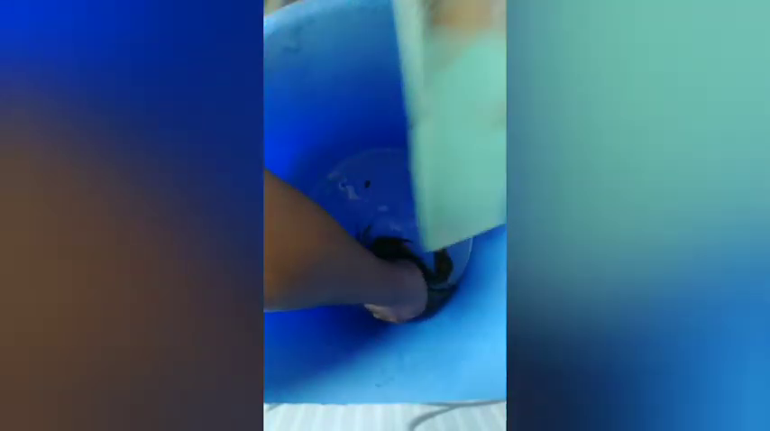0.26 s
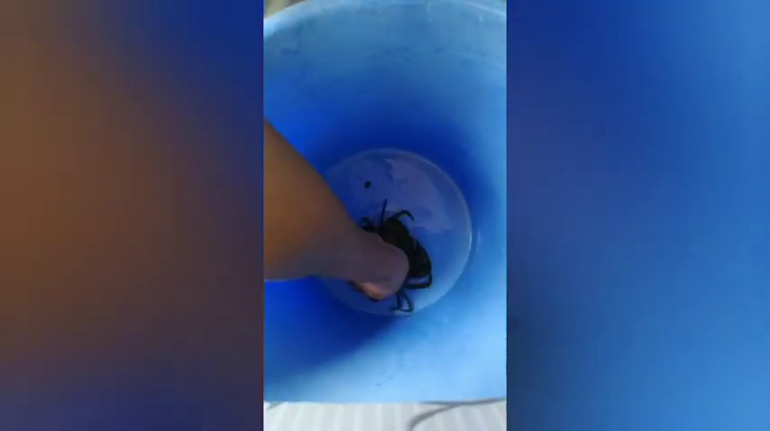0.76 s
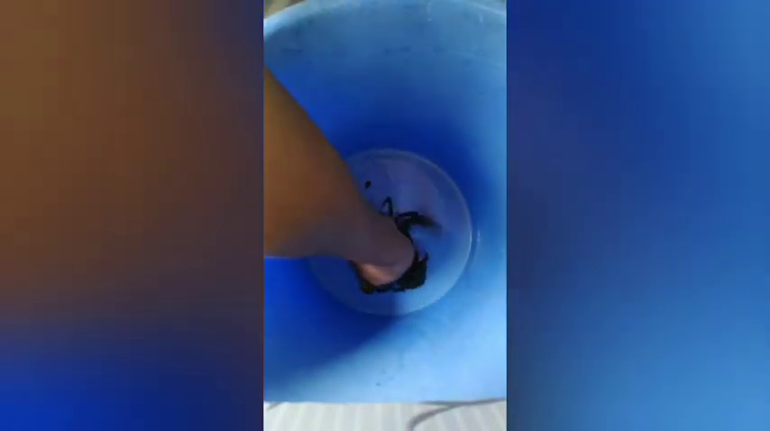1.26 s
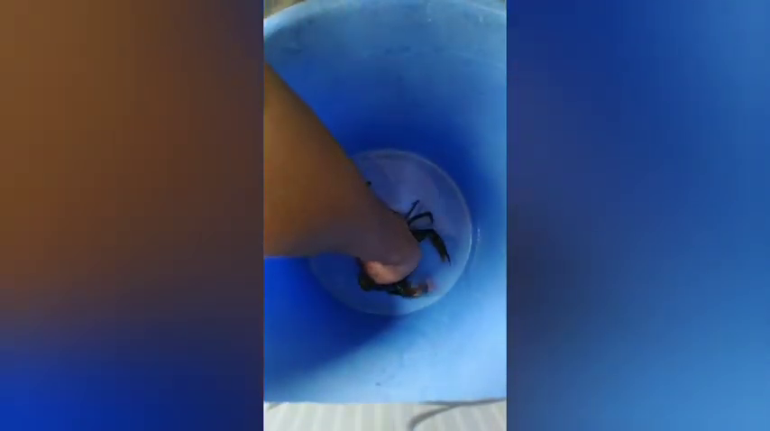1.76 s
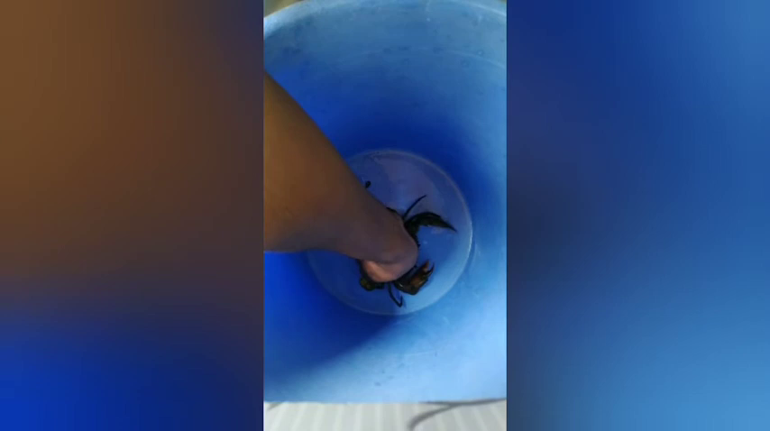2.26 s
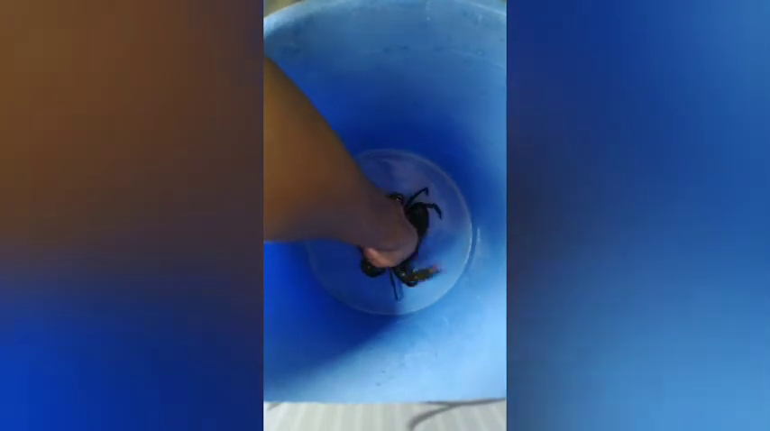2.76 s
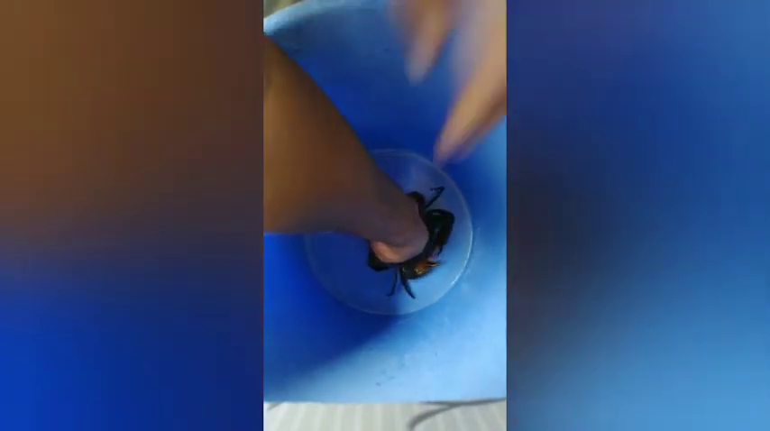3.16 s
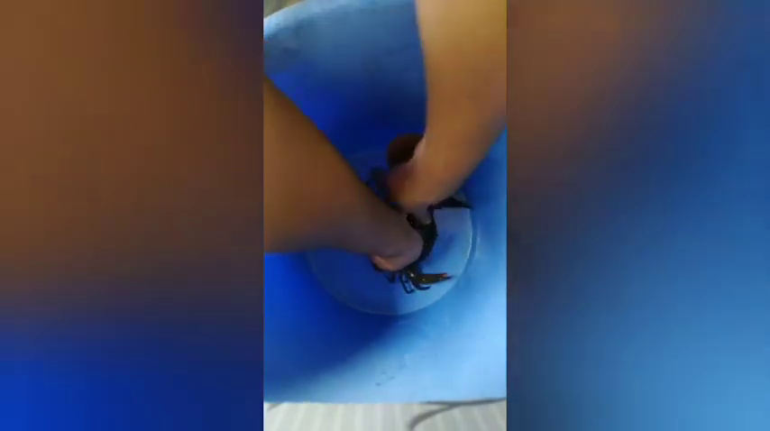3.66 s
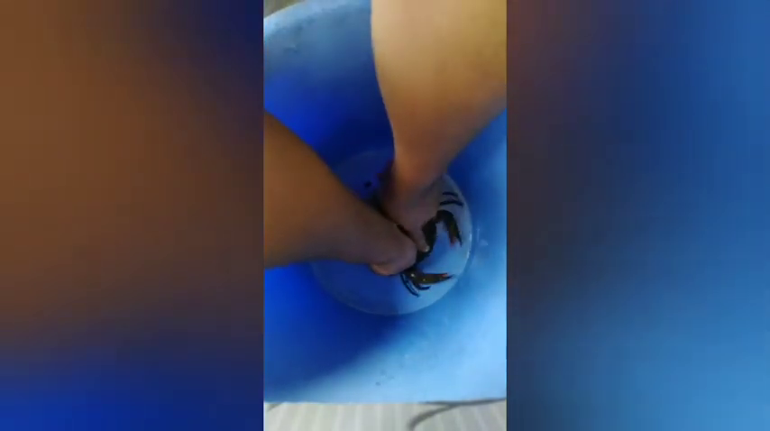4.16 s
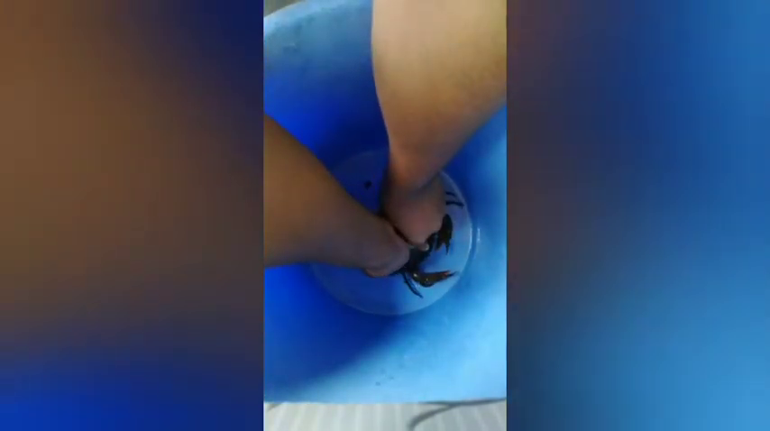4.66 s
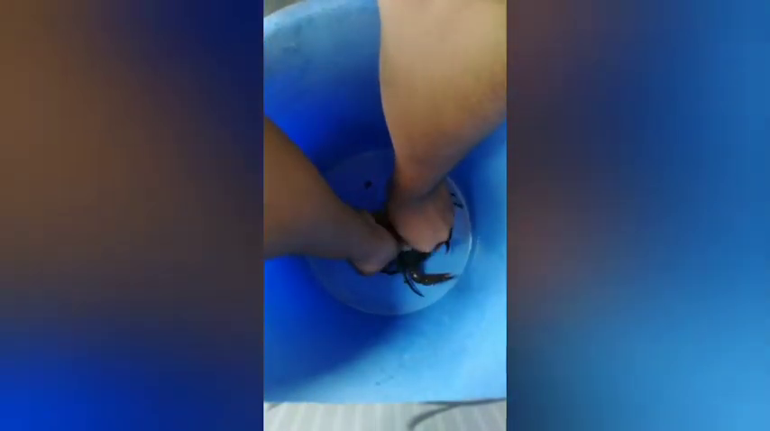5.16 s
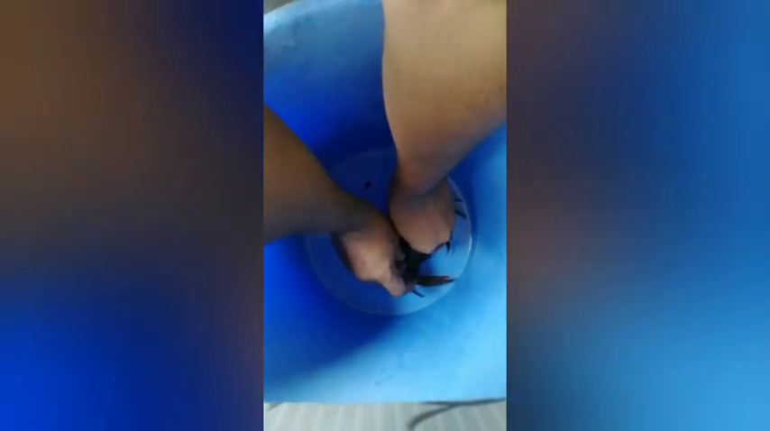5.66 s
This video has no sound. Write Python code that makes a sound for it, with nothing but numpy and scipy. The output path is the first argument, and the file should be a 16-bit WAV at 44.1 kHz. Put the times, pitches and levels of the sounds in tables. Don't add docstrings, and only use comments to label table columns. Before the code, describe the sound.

Close outdoor stereo of a live crab pinned in a plastic bucket. Hard shell knocks, claw scrapes and tiny leg ticks come in uneven bursts, with short squeaks and hollow hums from the plastic. A calmer gap falls around one and a half to two seconds, a dense scrabble follows, then only faint hand rubs and a few light taps remain over soft hiss and low rumble. Sound leans right.

```python
import sys
import numpy as np
from scipy import signal
from scipy.io import wavfile

SR = 44100
rng = np.random.default_rng(int(sys.argv[2]) if len(sys.argv) > 2 else 0)


def how_loud(loudness_db):
    steps = np.asarray(loudness_db, float) / 20
    return 10 ** steps


def put_to_file(sound):
    columns = np.atleast_2d(sound).T
    safe = np.clip(columns, -1, 1)
    whole_steps = np.round(safe * 32767)
    wavfile.write(sys.argv[1], SR, whole_steps.astype(np.int16))


N = 260190

# frequency in Hz, level in dB, decay t60 in seconds.
BOOM_MODES = [(128, -7.5, 0.019), (164, -9, 0.084), (230.1, 3, 0.13), (264, 0, 0.034), (319.3, -8.5, 0.081),
              (350, -8, 0.15), (389, -5.5, 0.023)]
# frequency in Hz, level in dB, decay t60 in seconds.
WALL_MODES = [(477, -6, 0.086), (560, -4, 0.093), (668, 3.5, 0.02), (837, -0.5, 0.027), (834, -7, 0.053),
              (1012, -4, 0.026), (1137, 0, 0.041), (1200, 4, 0.012), (1410, -1, 0.019), (1483, 0, 0.056),
              (1700, 2.5, 0.0038)]
# frequency in Hz, density in dB per Hz.
UPPER_SPECTRUM = [(1900, -5), (2500, -1.5), (3500, -4.5), (5000, -6), (7500, -10), (10000, -8.5),
                  (15500, -21.5)]

# time of full force in seconds, hold in seconds, wall level in dB,
# scratch level relative to the wall in dB, boom level relative to the wall in dB.
DRAGS = [(.036, 0.02, -24.5, -2.5, -4), (.085, 0.059, -33.5, -6.5, 3.5), (.218, 0.029, -27.5, -3.5, -5.5),
         (.2, .004, -34, -9.5, -3), (.275, 0.037, -30, -11, -11), (.584, 0.069, -35, -3, -5),
         (.69, 0.099, -41, -8, 4), (.893, 0.0039, -50.5, -1, 28.5), (1.1, 0.054, -45.5, -2, 1.5),
         (1.146, 0.0055, -30, -4, -25), (1.212, 0.0084, -32, -8, -8), (1.25, 0.043, -23.5, 2.5, -36),
         (1.272, 0.038, -31, -8, 13), (1.372, 0.014, -28, -8, 2.5), (1.42, 0.015, -29, 5.5, -5.5),
         (2.15, 0.038, -33, -4.5, -2), (2.342, 0.017, -23.5, 0.5, -5.5), (2.405, 0.045, -23.5, 6, -9.5),
         (2.53, .004, -28.5, -8.5, -4), (2.6, 0.004, -31, -7, 14), (2.638, .003, -31, 1.5, -7),
         (2.68, 0.0043, -29.5, -2, 5), (2.716, 0.0065, -22, -11, -8), (2.868, 0.055, -25.5, 0, -11.5),
         (2.94, 0.031, -25.5, -8.5, -1), (3.0, 0.065, -25.5, 0.5, 1.5), (3.25, 0.046, -30.5, -10, -15.5)]
# time of full force in seconds, hold in seconds,
# wall level in dB, relative scratch level in dB, relative boom level in dB.
JOLTS = [(.33, 0.0011, -19, -13, -21), (.624, 0.0018, -30, 3.5, -12), (.712, 0.0023, -25, -24, 1.5),
         (.733, 0.0033, -24.5, -11, -19), (1.008, 0.0013, -23.5, 1, -12.5), (1.408, 0.0028, -27.5, 10, -10),
         (2.448, 0.023, -19.5, -12, -3), (3.06, 0.0062, -28.5, -16, 12), (4.735, 0.0014, -40, -9.5, -21),
         (5.18, 0.0028, -52, -2.5, -3), (.427, 0.014, -12.5, -12.5, -4.5), (.47, 0.022, -28, -10, -12),
         (.838, 0.00088, -24, -4.5, -4), (.96, 0.0014, -16, -10, -22), (.978, 0.0081, -29.5, 7.5, -13),
         (1.737, 0.0012, -14.5, -8.5, -9), (2.538, 0.0018, -22, -13.5, -7), (2.575, 0.0077, -34, 5.5, -6),
         (2.642, 0.0037, -18, -2.5, 3), (3.168, 0.00076, -33, -0.5, 2.5), (3.4, 0.0025, -28.5, -4.5, -5),
         (3.425, 0.0047, -38.5, -3.5, -2), (3.935, 0.0015, -32.5, -4, -20), (5.462, 0.002, -48.5, 8, -1),
         (5.808, 0.0022, -38, 6, 4.5)]
# time of full force in seconds, hold in seconds,
# wall level in dB, relative scratch level in dB, relative boom level in dB.
GRIP_SHIFTS = [
    (1.48, 0.022, -60, -9, 10),
    (1.79, 0.0048, -45.5, -3, 1.5),
    (2.25, 0.061, -52.5, -8, 6.5),
    (2.82, 0.0032, -43, -8, -7),
    (3.46, 0.0032, -48.5, 1, -12),
    (3.55, 0.076, -60, -1, 5.5),
    (4.15, 0.072, -49.5, -7, -4.5),
    (4.384, 0.043, -58.5, -7, 12.5),
    (4.7, 0.014, -53, -28, 5.5),
    (4.8, 0.0099, -72, 11, -4),
]
# time of full force in seconds, hold in seconds,
# wall level in dB, relative scratch level in dB, relative boom level in dB.
CATCHES = [(.041, 0.002, -37, 4, -23), (.067, 0.0055, -35.5, 3, -13), (.135, 0.0074, -35, -13, -10),
           (.15, 0.0036, -53, -10, -15), (.297, 0.0046, -36, -21, -17), (.687, 0.005, -30, -16, -10),
           (.74, 0.0034, -22, -22, -19), (.852, 0.0082, -37, -4, -10), (.913, 0.0074, -44.5, -3.5, 19.5),
           (1.19, 0.0033, -37, -7, -7), (1.213, .004, -29.5, -11.5, -19), (1.258, 0.0029, -28, -16, -22),
           (1.383, 0.0048, -22, -9, -19), (1.419, 0.0025, -37.5, -9, -26), (1.433, 0.0027, -42, -6, -20),
           (1.72, .006, -37, 3.5, -4), (2.16, 0.0035, -51, -21, -18), (2.322, 0.0046, -28, -16, -21),
           (2.35, 0.0018, -32, 14, -9), (2.383, 0.0018, -27.5, 14.5, -20), (2.396, 0.0032, -37, 12, -28),
           (2.55, 0.0028, -51, -19, -1), (2.594, 0.0053, -26, 0, 1), (2.687, .004, -31, -17, -10),
           (2.706, 0.0027, -30, -14, -10), (2.887, .005, -26, 7, -20), (2.924, 0.005, -30.5, 5, -16),
           (2.963, .004, -22.5, -15, -10), (2.99, 0.0037, -19, -13, -21), (3.011, 0.0064, -29, 0, -19.5),
           (3.029, 0.0037, -28.5, 8.5, -20), (3.049, 0.0027, -28, 8, -20), (3.062, 0.0039, -17.5, -23, -20),
           (3.097, 0.0018, -27, -4, -0.5), (3.261, 0.003, -32, -16, -26), (3.28, 0.0025, -32, -28, -26),
           (3.315, 0.0057, -37.5, -6, -11), (3.45, 0.003, -43, -20, -12), (3.54, 0.008, -49, -2, 9.5),
           (4.1, 0.0053, -44.5, -11, -20), (5.78, 0.0024, -55, -1, -20)]

# time in seconds, peak in dB, boom in dB, snap in dB, left-right in dB.
SHELL_KNOCKS = [(0.041, -23, -18, -9, -25), (0.423, -21.5, -5, 7, -33), (0.432, -15, -37, -41, -26),
                (0.84, -28, -13, -16, -11), (0.959, -11.5, -27, -26, -15), (1.007, -13.5, -44, -5, -11),
                (1.285, -10.5, -14, 3, 12), (1.4073, -14, -30, 2, -24), (1.7343, -10, -14, -7, -25),
                (2.3818, -29.5, -34, 21, 12), (2.396, -40, -31, -14, 3), (2.448, -15, -22, -20, 3),
                (2.576, -34.5, 6, 10, -30), (2.642, -17.5, -2.5, -43, -11), (3.093, -30, -20, 6.5, -21),
                (1.1456, -33, -31, 7.5, 5), (3.253, -29, -25, -12, -28), (3.279, -33, -13, -27, -32),
                (3.4, -25.5, -22, -4, -24), (3.938, -37.5, -35, -34, -24), (4.737, -42.5, -3, -7, -10),
                (5.178, -40, -21.5, -16, -9), (5.806, -32.5, -7.5, -7, -12)]
# time in seconds, peak in dB, boom in dB, snap in dB, left-right in dB.
TIP_KNOCKS = [
    (0.329, -15.5, -16, -4, -41),
    (0.427, -20, -29, 6.5, -31),
    (0.584, -35.5, -23, 9.5, -5),
    (0.6238, -16.5, -18.5, 4.5, -26),
    (0.731, -30.5, -4.5, 5.5, -30),
]

# time in seconds, wall pitch in Hz, left-right balance in dB.
CRAB_CONTACT = [(0, 960, -32), (.3, 1190, -43), (.41, 484, 3), (.52, 550, -19), (.59, 1150, -6),
                (.74, 836, -26), (.85, 1100, -45), (1.15, 1090, -32), (1.3, 1200, -18), (1.43, 1700, -8.5),
                (1.72, 915, -4.5), (2.2, 1180, -28), (2.37, 1370, -14), (2.47, 920, -3), (2.6, 930, -34),
                (3.0, 1194, -29), (3.4, 1050, -11)]
# time in seconds, wall pitch in Hz, left-right balance in dB.
HAND_CONTACT = [
    (3.6, 730, -24),
    (4.801, 663, -7),
    (5.75, 925, -19),
]
# time in seconds, half length in seconds, shift to left in dB.
LEANS = [(0.445, 0.043, 1), (0.592, .015, -14), (.983, .012, 2), (1.165, .015, 17), (1.312, 0.025, 20),
         (1.43, 0.022, 14), (1.75, 0.026, 1.5), (2.353, 0.012, 10), (2.397, 0.012, 21), (2.472, 0.013, 4),
         (2.66, .015, 19), (2.69, 0.024, 12), (2.916, .02, 10), (3.083, 0.014, 9), (3.404, .02, 2),
         (4.2, .08, 2), (4.72, .05, -3), (5.3, 0.26, 2)]
# time in seconds, frequency in Hz.
SCRATCH_PITCH = [(0.0, 2950), (0.29, 2730), (0.32, 4750), (0.5, 2250), (0.57, 3930), (0.76, 4700),
                 (0.8, 2960), (1.03, 2560), (1.38, 4000), (1.54, 2920), (1.61, 4000), (1.81, 2420),
                 (1.85, 3280), (2.42, 2930), (2.99, 2900), (3.2, 4100), (3.23, 2740), (3.5, 2820)]
# time in seconds, top octave lift in dB, further highest hiss lift in dB.
SHARPNESS = [(0, -2.5, 0), (.32, -14, -10), (.34, 14, 6), (.41, -19, -4), (.7, 8, 3), (1.1, -10, 6),
             (1.28, 5, 1), (1.4, -8.5, -4), (2.3, -20.5, -7.5), (2.45, 0, 13), (2.65, -1.5, 7),
             (2.9, -11.5, -25), (3.17, 5, 3), (3.28, -10, 0), (3.95, 10, 2), (4.7, -5, -6), (4.8, 22, 2),
             (5.8, -18, -15.5)]

# start in seconds, end in seconds, first and last frequency in Hz, level in dB.
LOCKED_TONES = [(0.222, 0.333, 1253, 1200, -31), (1.079, 1.179, 959, 1173, -36.5),
                (1.143, 1.173, 2420, 2600, -32), (1.179, 1.282, 1151, 1271, -31),
                (1.192, 1.278, 2290, 2500, -39), (1.27, 1.29, 3150, 3090, -22.5),
                (1.362, 1.4, 1200, 1436, -24.5), (1.362, 1.411, 5340, 5220, -36),
                (1.408, 1.438, 1700, 1703, -14.5), (1.621, 1.624, 7250, 7050, -52),
                (1.637, 1.639, 4600, 4380, -41), (1.666, 1.669, 6740, 6700, -43),
                (1.923, 1.926, 3140, 3120, -45), (2.372, 2.447, 1700, 1700, -21),
                (2.417, 2.481, 2480, 2444, -27), (2.773, 2.797, 3660, 3200, -41.5),
                (2.862, 2.916, 2446, 2370, -24.5), (2.995, 3.027, 1157, 1200, -20),
                (3.012, 3.08, 5260, 5070, -34), (5.46, 5.477, 3780, 3530, -46),
                (5.608, 5.645, 5150, 4900, -50.5), (5.611, 5.643, 6100, 6450, -52.5),
                (0.034, 0.11, 235.5, 245, -28.5), (0.423, 0.452, 612, 550, -21), (1.737, 1.79, 250, 301, -26),
        (2.444, 2.48, 356, 300, -20), (2.445, 2.47, 629, 650, -23.5), (3.037, 3.064, 250, 770, -29.5),
        (3.26, 3.32, 710, 880, -32.5), (4.177, 4.237, 798, 770, -41), (0.425, 0.505, 127.6, 116, -26),
        (0.774, 0.793, 293, 270, -29), (0.906, 0.93, 333, 186, -28.5), (.888, .902, 490, 280, -45),
        (3.53, 3.578, 195, 130, -43), (4.217, 4.278, 243, 221, -40.5), (4.385, 4.448, 223, 240, -44),
        (4.66, 4.764, 260, 148, -48), (4.13, 4.2, 400, 330, -50), (4.58, 4.64, 243, 230, -50.5),
        (2.36, 2.39, 224, 193, -32.5), (3.25, 3.258, 1250, 1250, -29), (3.27, 3.286, 1350, 1470, -21.5),
        (2.95, 2.975, 525, 696, -37.5), (3.06, 3.105, 720, 485, -28), (1.208, 1.222, 1200, 1230, -21.5),
        (2.391, 2.402, 1900, 2030, -24.5), (.91, .94, 94, 150, -34), (2.382, 2.39, 1650, 1570, -28),
        (2.393, 2.4, 3300, 2650, -13), (3.258, 3.265, 1140, 1400, -20), (3.4, 3.413, 1160, 1060, -24),
        (5.805, 5.816, 1540, 1580, -36.5), (5.775, 5.785, 1970, 1400, -56), (3.045, 3.053, 1420, 1200, -19),
        (3.057, 3.065, 1420, 1340, -18.5), (1.125, 1.172, 1300, 1000, -30), (.0405, 0.053, 1235, 1170, -26),
        (3.218, 3.25, 1400, 1330, -40.5), (2.336, 2.348, 5700, 6450, -42), (3.425, 3.446, 250, 266, -40),
        (.497, .53, 120, 130, -33.5), (1.2845, 1.293, 1140, 1400, -20), (1.735, 1.748, 1000, 980, -21),
        (1.225, 1.275, 1150, 1200, -25)]

# frequency in Hz, density in dB per Hz.
OUTDOOR_SPECTRUM = [(30, -37), (60, -21), (125, 0.5), (230, -6), (400, -4.5), (650, -5), (1000, -7.5),
                    (1400, -13), (2200, -11), (3600, -16.5), (5000, -12.5), (7900, -19), (12300, -13),
                    (13200, -32.5)]
# time in seconds, level in dB.
BREEZE = [
    (0.0, 2),
    (5.9, -3),
]
# start in seconds, end in seconds, frequency in Hz, level in dB.
FAR_TONES = [
    (1.86, 2.143, 595, -69),
    (3.65, 4.088, 648, -70),
    (4.06, 4.276, 502, -62.5),
    (4.466, 4.76, 653, -68.5),
    (5.79, 5.879, 950, -49),
    (5.82, 5.895, 2350, -75),
    (5.732, 5.813, 943, -64),
]

BOOM_SIDE_SHARE = 0.78
LEFT_SHADE = how_loud([[-4.0], [0]])


def bucket():
    power = strokes(DRAGS, rise_db_s=638, fall_db_s=679)
    power = power + strokes(JOLTS, rise_db_s=2494, fall_db_s=638)
    power = power + strokes(GRIP_SHIFTS, rise_db_s=89, fall_db_s=272)
    power = power + strokes(CATCHES, rise_db_s=1491, fall_db_s=1304)
    rub, bright, deep = np.sqrt(power)
    pan_db = side_of_contact()
    s, peak_db, thud_db, snap_db, side_db, snap_hz = np.transpose(knocks())
    blow = how_loud(peak_db) * both_ears(side_db)
    low = boom(deep, pan_db, blow, thud_db)
    middle = wall(rub, pan_db, blow)
    high = scratch(bright, pan_db, blow, snap_db, snap_hz)
    knock = how_loud(25) * cracks(blow, low_hz=600, high_hz=2200)
    snap = LEFT_SHADE * how_loud(11.5) * cracks(blow * how_loud(snap_db), low_hz=2000, high_hz=7660)
    return low + middle + high + knock + snap


def boom(deep, pan_db, blow, thud_db):
    lag_s = 0.0045
    deep = np.interp(np.arange(N) - lag_s * SR, np.arange(N), deep)
    scrape = both_ears(BOOM_SIDE_SHARE * pan_db) * deep * how_loud(-6.5)
    scrape = scrape * slips(per_s=2500, spread_db=5.2, lumpy_db=1.2, alike=1.0)
    blows = blow * how_loud(np.minimum(thud_db, -6) + 28.0)
    modes = body(BOOM_MODES, scrape, blows, 1.8, lambda hz: 0, lambda hz: 0)
    return band(modes, 121.6, 620, order=3)


def wall(rub, pan_db, blow):
    contact_hz = in_time(CRAB_CONTACT + HAND_CONTACT)[0]
    scrape = both_ears(pan_db) * rub * how_loud(-3)
    scrape = scrape * slips(per_s=3000, spread_db=2.5, lumpy_db=1.5, alike=.4)

    def colour(hz):
        return near(hz, contact_hz, lift_db=11.0, octaves=.47)

    modes = body(WALL_MODES, scrape, blow * how_loud(11), 1.9, colour, lambda hz: 0)
    return band(modes, 210, 1960, order=3)


def scratch(bright, pan_db, blow, snap_db, snap_hz):
    tip_hz = in_time(SCRATCH_PITCH)[0]
    sharp_db, hiss_db = in_time(SHARPNESS) + drift(2.5)
    scrape = both_ears(pan_db) * bright * how_loud(-5.5)
    scrape = scrape * slips(per_s=3000, spread_db=1.8, lumpy_db=2.17, alike=0.06)

    def scrape_colour(hz):
        top_octave = np.clip(np.log2(hz / 6000), 0, 1)
        highest = np.clip(hz / 2500 - 5, 0, 1.3)
        return near(hz, tip_hz, lift_db=5.0, octaves=.55) + sharp_db * top_octave + hiss_db * highest

    def blow_colour(hz):
        return near(hz, snap_hz, lift_db=9.0, octaves=.4)

    blows = blow * how_loud(snap_db + 11.5)
    modes = body(upper_modes(cycles=71.0), scrape, blows, 2.2, scrape_colour, blow_colour)
    return LEFT_SHADE * band(modes, 710, 22000, order=3)


def cracks(blows, low_hz, high_hz):
    spikes = np.zeros((2, N)) + 1e-18
    spikes[:, knock_samples()] = blows
    return band(spikes, low_hz, high_hz, order=2)


def squeaks(sharpness, steady):
    out, pan_db = np.zeros((2, N)), side_of_contact()
    for start, end, first_hz, last_hz, db in LOCKED_TONES:
        at = np.arange(round(start * SR), round(end * SR))
        part = (at - at[0]) / len(at)
        r = np.exp(-np.pi * min(first_hz, 2000.0) / sharpness / SR)
        chance = rng.standard_normal((2, SR // 4))
        waver = signal.lfilter([1], [1, -2 * r, r * r], chance[0] + 1j * chance[1])[-len(at):]
        grip = steady + waver / np.sqrt(np.mean(np.abs(waver) ** 2))
        grip = grip / np.sqrt(np.mean(np.abs(grip) ** 2))
        hz = first_hz + (last_hz - first_hz) * part
        tone = np.real(grip * np.exp(2j * np.pi * np.cumsum(hz) / SR))
        swell = np.sin(np.pi / 2 * np.minimum(part / .2, 1)) ** 2 * (1 - part) ** .6
        side_share = BOOM_SIDE_SHARE if first_hz < 400 else 1
        out[:, at] += how_loud(db) * swell * tone * both_ears(pan_db[at] * side_share)
    return band(out, 115, 20000, order=3)


def strokes(rows, rise_db_s, fall_db_s):
    t, out = np.arange(N) / SR, np.zeros((3, N))
    for full, hold, db, bright_db, boom_db in rows:
        at = slice(max(round((full - 1 / 2) * SR), 0), round((full + hold + 1 / 2) * SR))
        before, after = np.maximum(full - t[at], 0), np.maximum(t[at] - full - hold, 0)
        shape = db - rise_db_s * before - fall_db_s * after
        out[:, at] += how_loud(shape + np.array([[0], [bright_db], [boom_db]])) ** 2
    return out


def slips(per_s, spread_db, lumpy_db, alike):
    sizes = how_loud(spread_db * np.minimum(rng.exponential(1, (2, N)), 3))
    sizes = sizes * rng.choice([-1, 1], (2, N))
    happens = rng.random((2, N)) < per_s / SR
    clicks = sizes * happens * how_loud(lumpy_db * np.tanh(drift(31)))
    alike = np.clip(alike, 0, 1)
    clicks[0] = alike * clicks[1] + np.sqrt(1 - alike ** 2) * clicks[0]
    return rms_one(clicks)


def body(modes, scrape, blows, patchy_db, scrape_colour, blow_colour):
    out, at = 0, knock_samples()
    total = np.sqrt(sum(how_loud(2 * db) for hz, db, t60 in modes))
    for k, (hz, db, t60) in enumerate(modes):
        force = scrape * how_loud(patchy_db * drift(7.56) + scrape_colour(hz))
        uneven_db = 2.5 * rng.standard_normal((len(at), 2)).T
        force[:, at] += blows * how_loud(blow_colour(hz) + uneven_db)
        out = out + how_loud(db) / total * ring(force, hz, t60) * (-1) ** k
    return out


def ring(force, hz, t60):
    r, w = how_loud(-60 / (t60 * SR)), 2 * np.pi * hz / SR
    gain = np.sin(w) * 2 * np.sqrt(1 - r)
    return signal.lfilter([0, gain], [1, -2 * r * np.cos(w), r * r], force + 1e-18)


def upper_modes(cycles):
    hz = np.geomspace(1860, 15500, 26) * how_loud(rng.normal(0, .12, 26))
    return [(f, at_hz(UPPER_SPECTRUM, f) + 10 * np.log10(f / 2000), cycles / f) for f in hz]


def near(hz, contact_hz, lift_db, octaves):
    return lift_db * (np.exp(-(np.log2(hz / contact_hz) / octaves) ** 2) - .6)


def knocks():
    shell = [(*row, 3220) for row in SHELL_KNOCKS]
    return shell + [(*row, 5770) for row in TIP_KNOCKS]


def knock_samples():
    return [round(row[0] * SR) for row in knocks()]


def side_of_contact():
    t = np.arange(N) / SR
    leans = sum(db * np.exp(-((t - s) / half) ** 2) for s, half, db in LEANS)
    return in_time(CRAB_CONTACT + HAND_CONTACT)[1] + leans


def both_ears(pan_db):
    pan_db = np.clip(pan_db, -30, 12)
    return np.array([how_loud(pan_db), np.ones_like(pan_db)]) * 2 / np.sqrt(1 + how_loud(2 * pan_db))


def echoes(x, t60, cut_hz):
    size = SR // 4
    tail = rng.standard_normal((2, size)) * how_loud(-60 * np.arange(size) / SR / t60)
    tail[:, :SR // 200] = 0
    tail = tail[0] + band(tail - tail[0], 500, 20000, order=1)
    tail = signal.sosfilt(signal.butter(1, cut_hz, fs=SR, output="sos"), tail)
    tail = tail / np.sqrt(np.sum(tail ** 2, axis=1, keepdims=True))
    return signal.fftconvolve(x.mean(axis=0)[None], tail, axes=1)[:, :N]


def outdoors(patchy_db, alike):
    out, edges = 0, 30 * 2 ** np.arange(0, 9.2, .5)
    white = rng.standard_normal((2, 2, N))
    for k, (low, high) in enumerate(zip(edges, edges[1:])):
        mid, side = band(white[k % 2], low, high, order=2)
        share = np.clip(alike - 0.14 * np.log2(low / 125), 0, 1)
        gain = how_loud(at_hz(OUTDOOR_SPECTRUM, np.sqrt(low * high)) + patchy_db * drift(11.7))
        out = out + gain * (np.sqrt(1 + share) * mid + np.sqrt(1 - share) * side * [[1], [-1]])
    floor_db = -60
    return how_loud(floor_db + 4.0 + in_time(BREEZE)[0]) * rms_one(out)


def far_tones(wobble_db):
    t, out = np.arange(N) / SR, 0
    for start, end, hz, db in FAR_TONES:
        swell = np.sin(np.pi * np.clip((t - start) / (end - start), 0, 1)) ** .5
        out = out + swell * how_loud(db + 7.0 + wobble_db * drift(7.1)) * np.sin(2 * np.pi * hz * t)
    return out


def band(x, low_hz, high_hz, order):
    return signal.sosfilt(signal.butter(order, [low_hz, high_hz], "band", fs=SR, output="sos"), x)


def drift(rate):
    hold = 40
    r = np.exp(-2 * np.pi * rate * hold / SR)
    slow = signal.lfilter([1], [1, -2 * r, r * r], rng.standard_normal(N // hold + 2002))[2000:]
    return np.repeat(rms_one(slow), hold)[:N]


def in_time(rows):
    s, *columns = np.transpose(rows)
    return [np.interp(np.arange(N) / SR, s, c) for c in columns]


def at_hz(points, hz):
    point_hz, db = np.transpose(points)
    return np.interp(np.log(hz), np.log(point_hz), db)


def rms_one(x):
    return x / np.sqrt(np.mean(x ** 2) + 1e-20)


def scene():
    close = bucket() + squeaks(sharpness=7.8, steady=0.95)
    far = outdoors(patchy_db=2.0, alike=0.95) + far_tones(wobble_db=2)
    return close + how_loud(-19.5) * echoes(close, t60=0.16, cut_hz=2600) + far


def band_limit(x):
    return signal.sosfilt(signal.butter(12, 15850, fs=SR, output="sos"), x)


def record(dry):
    lag = 18
    late = np.array([np.concatenate([np.zeros(lag), dry[0, :-lag]]), dry[1]])
    low = signal.sosfiltfilt(signal.butter(12, 7900, fs=SR, output="sos"), late)
    stepped = low + how_loud(-16) * (late - low)
    stepped = signal.sosfilt(signal.cheby2(10, 60, 16400, fs=SR, output="sos"), stepped)
    limited = stepped / (1 + (stepped / .8) ** 6) ** (1 / 6)
    return band_limit(limited)


dry = scene()
out = record(dry)
put_to_file(out)
```